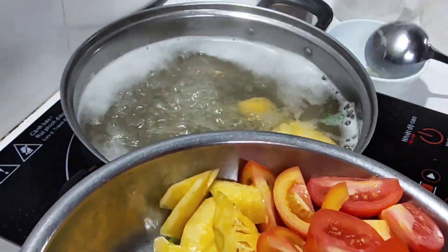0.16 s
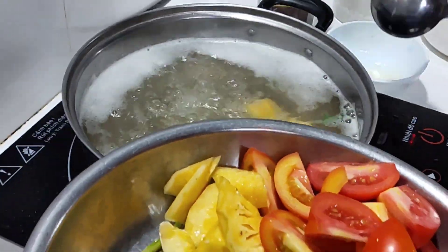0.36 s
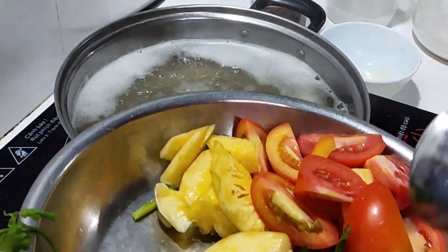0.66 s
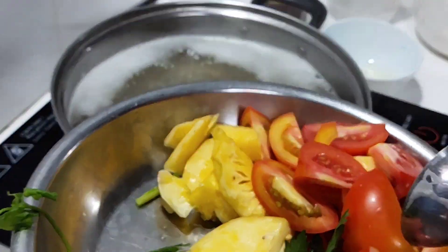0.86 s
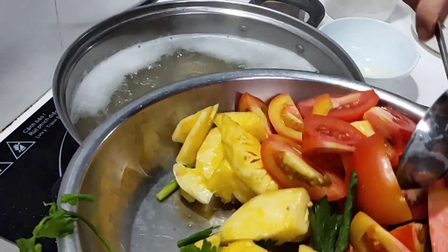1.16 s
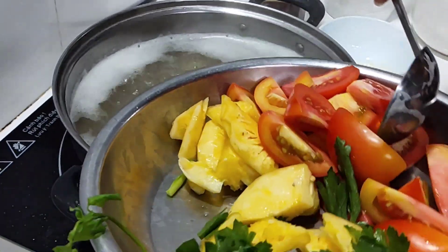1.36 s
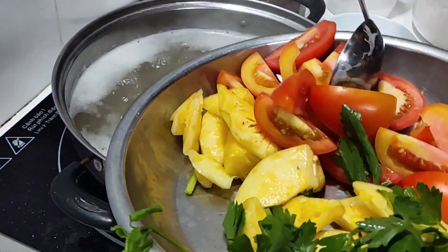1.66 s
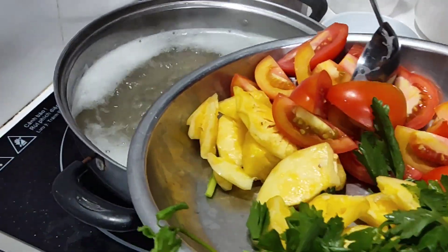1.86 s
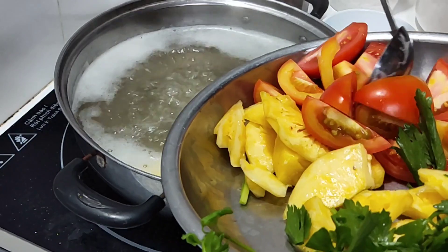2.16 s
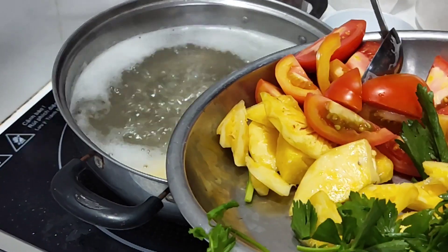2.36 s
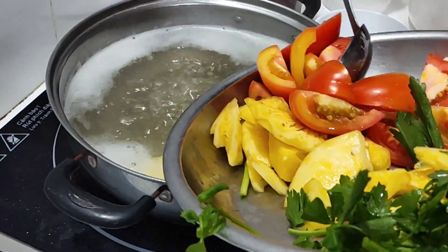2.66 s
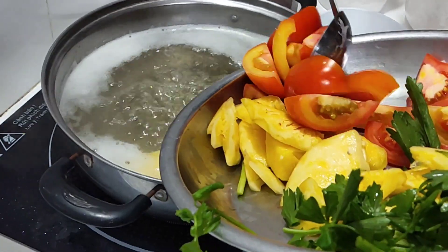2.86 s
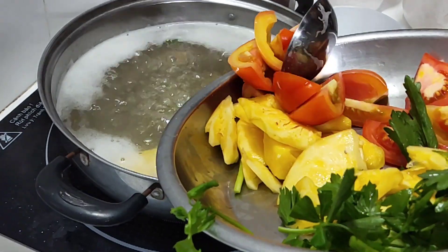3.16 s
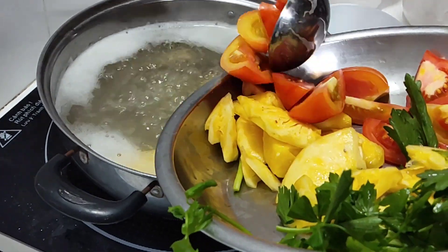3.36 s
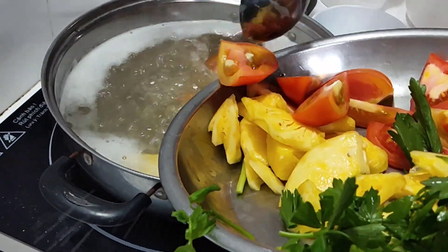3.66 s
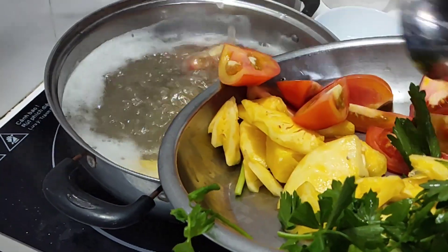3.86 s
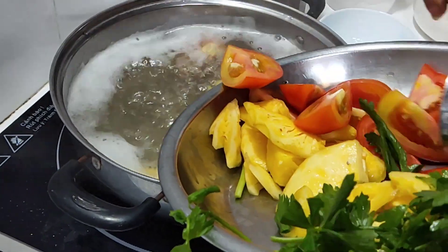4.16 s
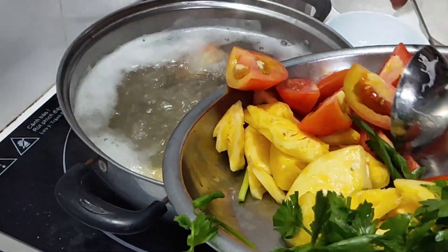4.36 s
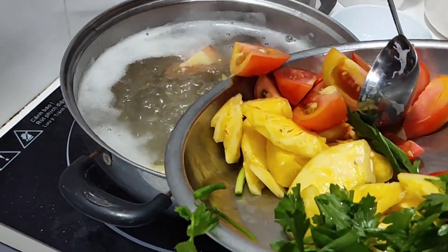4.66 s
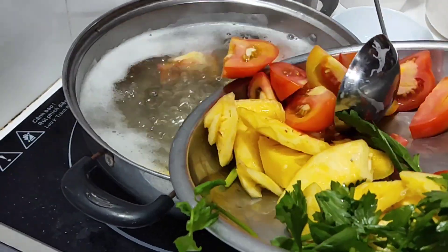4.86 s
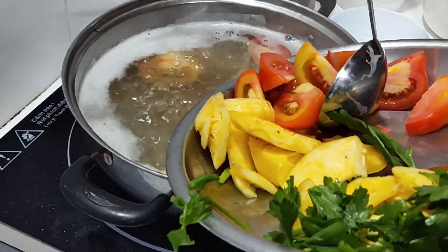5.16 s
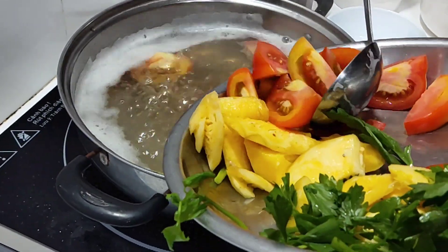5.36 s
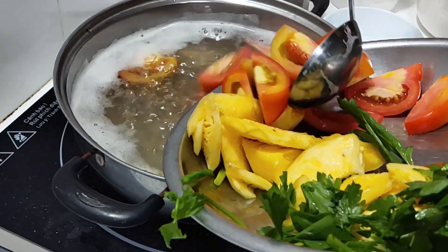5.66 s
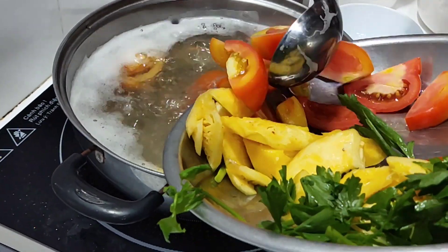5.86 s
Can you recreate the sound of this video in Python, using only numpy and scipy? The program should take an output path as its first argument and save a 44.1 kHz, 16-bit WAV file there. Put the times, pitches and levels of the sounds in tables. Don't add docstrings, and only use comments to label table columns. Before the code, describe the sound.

A bright steel ladle clatter on a dish, then scattered metallic knocks and scrapes in a bowl over a steady fan hum and boiling hiss.

```python
import sys
import numpy as np
from scipy import signal
from scipy.fft import rfft, irfft
from scipy.io import wavfile

SR = 44100
rng = np.random.default_rng(int(sys.argv[2]) if len(sys.argv) > 2 else 0)


def generate_wav(sig):
    pcm = np.round(np.clip(np.atleast_2d(sig).T, -1, 1) * 32767).astype(np.int16)
    wavfile.write(sys.argv[1], SR, pcm)


def boost_factor(decibels):
    exponent = np.asarray(decibels, float) / 20
    return 10 ** exponent


N = 264600
FAR_LEAD_S = -.00033

# (time [s], level above 3.5 kHz [dB], 1.5-3.5 kHz re that [dB], below 1.5 kHz re that [dB])
DISH_HITS = [
    (0.1534, -2.5, -16, -19),
]
# (time [s], treble level [dB], mid re treble [dB], low re treble [dB])
DISH_RATTLE = [
    (0.0918, -18, -22, -18),
    (0.0988, -22.5, -19.5, -18),
    (0.1047, -27.5, -18, 3),
    (0.1592, -7, -43, -7.5),
    (0.164, -6.5, -9, -7.5),
]
# (time of peak [s], treble level [dB], build-up [s], let-off [s], mid re treble [dB])
DISH_SLIDE = [
    (.075, -45, 0.017, .05, -19),
    (.1, -33, 0.011, 0.03, -26),
]
# (frequency [Hz], level [dB], T60 [s])
DISH = [(874, -6, 0.21), (1290, 5, 0.14), (1770, -3, 0.17), (2120, -7.5, 0.33), (2740, -7, 0.15),
        (3440, -18.5, 0.72), (4230, -23.5, 0.45), (4620, -0.5, 0.99), (4770, -10, 0.4), (5360, -2, .26),
        (5700, 9.5, 0.029), (6230, 2.5, 0.052), (6900, -8.5, 0.79), (7140, -10.5, 0.4), (8160, 7, 0.13)]


def dish():
    metal = blows(DISH_HITS, DISH, free_db=-5.5, damped_s=.045, crack_db=9, lead_s=FAR_LEAD_S,
                  wash_s=.33, spread=1)
    metal += blows(DISH_RATTLE, DISH, free_db=-41, damped_s=0.058, crack_db=10, lead_s=FAR_LEAD_S,
                   wash_s=0.22, spread=1)
    metal += scrapes(DISH_SLIDE, DISH, damping=0.092, rasp_db=16.0)
    muted_s, mute_db_per_s = 0.305, 500
    return metal * boost_factor(-mute_db_per_s * np.maximum(np.arange(N) / SR - muted_s, 0))


# (time [s], treble level [dB], mid re treble [dB], low re treble [dB])
SET_DOWN = [
    (0.2854, -32, 14.5, 3.6),
    (0.2904, -29.5, -2, 23),
    (0.3127, -22.5, 4, 6),
    (0.3174, -25, 11.5, 12),
    (.333, -47.5, 9.5, 12),
]
# (frequency [Hz], level [dB], T60 [s])
COUNTER = [(284, -12, 0.084), (680, -8, 0.06), (760, -18, 0.21), (824, 0, 0.036), (1040, -24, 0.14),
           (1290, -5.5, 0.2), (1390, -4, 0.14), (1655, -9, 0.36), (1990, -4, 0.15), (2290, -12, 0.18),
           (2740, -9, 0.13), (3430, -22, 0.1), (4440, -2, 0.08), (5400, -23, 0.22), (5870, -7, .1),
           (6750, -23, 0.22)]
# (time [s], treble level [dB], mid re treble [dB], low re treble [dB])
SETTLE = [
    (0.3455, -17.5, 1, 10),
    (.397, -48, 13, 12),
    (.448, -43, 8.7, 12),
]
# (frequency [Hz], level [dB], T60 [s])
COUNTER_FLAT = [(421, -5.5, 0.16), (616, -1, 0.062), (802, -9, 0.11), (1382, -8, 0.15), (1665, 10, 0.44),
                (2100, -1, .2), (2720, -4, .2), (5100, -9, .1), (6130, 9, .045), (6640, -6, .06)]


def counter():
    metal = blows(SET_DOWN, COUNTER, free_db=-11.5, damped_s=0.023, crack_db=2.5, lead_s=FAR_LEAD_S,
                  wash_s=0.79, spread=1)
    metal += blows(SETTLE, COUNTER_FLAT, free_db=-18.5, damped_s=0.017, crack_db=1.5, lead_s=FAR_LEAD_S,
                   wash_s=0.35, spread=0.83)
    return metal


# (time [s], treble level [dB], mid re treble [dB], low re treble [dB])
BOWL_HITS = [
    (1.904, -30.5, -3, 4.5),
    (2.1853, -33, -17, 0),
    (3.7686, -32.5, -11, -8),
]
# (frequency [Hz], level [dB], T60 [s])
BOWL = [(334, 3.5, 0.16), (560, -3, 0.38), (696, 0, 0.095), (778, 15, 0.33), (1740, -2, 0.25),
        (1843, 3.5, 0.31), (2280, -3.5, 0.57), (2770, 2.5, .25), (2830, -4.5, .1), (3800, 4, 0.17),
        (4570, -28, 0.26), (4890, -16.5, .28), (5040, -5, .2), (5770, 3.5, .15), (6160, -1.5, .5),
        (6070, -7.5, .1), (7300, -9, .2), (7280, -9, .2), (7270, -17.5, 0.18)]
# (time [s], treble level [dB], mid re treble [dB], low re treble [dB])
BOWL_KNOCK = [
    (1.6864, -12, -3, 1),
    (1.6905, -20, 2, -3.5),
    (1.6935, -19.5, 5, -3),
]
# (frequency [Hz], level [dB], T60 [s])
KNOCKED = [(317, 1.5, 0.062), (678, 1.5, 0.1), (858, 1.5, 0.096), (1703, -1, 0.13), (1890, -2, 0.19),
           (2837, -4, 0.085), (4010, -5.5, 0.063), (4860, -9.5, .12), (5020, -2.5, .08),
           (5430, -9.5, 0.063), (5920, -7.5, .08), (6160, -6, .14), (6340, -9.5, .055), (7100, -12, .1),
           (7240, -6, 0.046)]
# (time [s], treble level [dB], mid re treble [dB], low re treble [dB])
RATTLE = [
    (1.0657, -20, -12, -10),
    (1.071, -28, -7, -15),
    (1.079, -34, -7, -19),
    (1.087, -27, -5.5, -19),
    (1.0917, -24.5, -9, -15),
    (1.098, -28, -4, -15),
    (1.104, -28, -11, -16),
    (1.115, -35, -1, -8),
]
# (frequency [Hz], level [dB], T60 [s])
RATTLED = [(580, 5, 0.078), (720, -5, .05), (1335, 0, .1), (1960, -7, .1), (2850, -4, .15),
           (2990, -5.5, 0.11), (4300, -6, .04), (4840, -8, .15), (5000, -13, .08), (5440, -20, .08),
           (6144, 1.5, .15), (6250, -4, .06), (7030, -8, .1), (7400, -16, .08)]


def bowl():
    metal = blows(BOWL_HITS, BOWL, free_db=-13.5, damped_s=0.018, crack_db=8.5, lead_s=.00003, wash_s=.2)
    metal += blows(BOWL_KNOCK, KNOCKED, free_db=-14, damped_s=0.07, crack_db=0.5, lead_s=0, wash_s=0.12,
                   treble_pan_db=-3.5)
    metal += blows(RATTLE, RATTLED, free_db=-6.5, damped_s=0.04, crack_db=-3.0, lead_s=.00002, wash_s=.06,
                   treble_pan_db=-5.0)
    return metal


# (time [s], treble level [dB], mid re treble [dB], low re treble [dB])
RIM_HITS = [
    (4.1742, -12.5, -9, -5),
    (4.1844, -31, -4, 8.5),
    (4.228, -26.5, -14, -13),
]
# (frequency [Hz], level [dB], T60 [s])
RIM = [(436, 6.5, 0.15), (757, 0, 0.2), (934, 2.5, 0.11), (1815, 4.5, 0.16), (2020, 2.5, 0.13),
       (3500, -4.5, 0.023), (4740, -9, 0.1), (5100, -2, 0.065), (5500, 2.5, 0.045), (5880, -3, 0.07),
       (6150, 1.5, 0.14), (6430, -6, 0.093), (6700, -9, .1), (7650, -7.5, 0.1)]
# (time [s], treble level [dB], mid re treble [dB], low re treble [dB])
HANDLE_HITS = [
    (4.2654, -25, -2, -6),
    (4.2724, -31, -4, 6.5),
]
# (frequency [Hz], level [dB], T60 [s])
HANDLE = [(862, 4.5, 0.093), (1330, 0, 0.094), (1700, -5, .06), (2140, 2, 0.053), (4400, -14, 0.05),
          (5700, 6, .06), (6730, 0, .06)]
# (time [s], treble level [dB], mid re treble [dB], low re treble [dB])
HANDLE_TIP = [
    (4.2784, -26, -13, -17),
    (4.2825, -33, -16, -16),
]
# (frequency [Hz], level [dB], T60 [s])
TIP = [(850, 0, .06), (2090, 1, .06), (4400, 4, 0.072), (6430, -15, .05)]


def rim():
    metal = blows(RIM_HITS, RIM, free_db=-18, damped_s=0.11, crack_db=8.5, lead_s=.00002, wash_s=0.11)
    metal += blows(HANDLE_HITS, HANDLE, free_db=-28, damped_s=0.06, crack_db=5.0, lead_s=.00003, wash_s=.1)
    metal += blows(HANDLE_TIP, TIP, free_db=-16, damped_s=0.042, crack_db=-9.0, lead_s=.00003, wash_s=.05)
    return metal


# (time [s], treble level [dB], mid re treble [dB], low re treble [dB])
THUDS = [
    (0.9365, -44, 3, 24),
    (1.0590, -44, 3, 24),
]
# (frequency [Hz], level [dB], T60 [s])
THUD = [(530, 9, 0.021), (780, -9, 0.048), (1800, 0, .05), (4470, -2, .03)]
# (time [s], treble level [dB], mid re treble [dB], low re treble [dB])
FLECK = [
    (3.0599, -32, -8, -5),
]
# (frequency [Hz], level [dB], T60 [s])
FLECKED = [(900, -1, .05), (2000, 0, .05), (4500, -7, .03), (5240, 2, .1), (6300, -5, .05), (7100, -6, .05)]


def fruit():
    metal = blows(THUDS, THUD, free_db=-21, damped_s=0.027, crack_db=-11.0, lead_s=0, wash_s=.05)
    metal += blows(FLECK, FLECKED, free_db=-11, damped_s=0.04, crack_db=1.5, lead_s=0, wash_s=.05)
    return metal


# (time [s], treble level [dB], mid re treble [dB], low re treble [dB])
LADLE_HITS = [
    (0.936, -28, -3.5, -2),
    (1.0355, -22.5, -10, -2),
    (1.24, -39.5, -13, -12),
    (1.263, -27.5, -6, -2.5),
    (1.3994, -42.5, 0, 2.5),
    (4.8083, -33.5, -9, 0),
    (5.1556, -35, -3, 5),
]
# (time [s], treble level [dB], mid re treble [dB], low re treble [dB])
DRY_CLICKS = [
    (0.5985, -29.5, -14, -3),
    (2.5017, -31, 0.5, 2),
    (3.6555, -24, -19, -10),
    (3.6626, -27, -17.5, -0.5),
    (3.71, -30.5, -14.5, -11),
    (3.7386, -42.5, 0, 16),
    (5.757, -17.5, -9, -8),
]
# (frequency [Hz], level [dB], T60 [s])
LADLE = [(524, 4, 0.13), (778, 2.5, 0.37), (1810, -4, 0.13), (2560, -12, 0.025), (4600, 4, 0.018),
         (4610, -7.5, 0.12), (5680, 0, 0.18), (6130, 3, 0.06), (7660, -17.5, .1)]
# (time [s], treble level [dB], mid re treble [dB], low re treble [dB])
PINGS = [
    (1.9577, -46, -11, -22),
    (2.013, -28, -11, 0.5),
    (4.2932, -34, -15, -7),
    (4.8263, -29.5, -16.5, -21),
    (5.637, -32, -19, -24.5),
]
# (frequency [Hz], level [dB], T60 [s])
PING = [(800, 3, 0.059), (1980, -5.5, 0.25), (3000, -9, 0.053), (5370, 0, 0.078), (6020, 3.5, 0.27),
        (6250, -17.5, .1), (6600, -9.5, 0.08)]


def ladle():
    metal = blows(LADLE_HITS, LADLE, free_db=-37.5, damped_s=0.043, crack_db=-2.5, lead_s=.00001, wash_s=.1)
    metal += blows(DRY_CLICKS, LADLE, free_db=-31.5, damped_s=0.04, crack_db=11.0, lead_s=.0001, wash_s=.1)
    metal += blows(PINGS, PING, free_db=-6, damped_s=.045, crack_db=-3, lead_s=.00003, wash_s=.06)
    return metal


# (time [s], treble level [dB], mid re treble [dB], low re treble [dB])
RUB_HITS = [
    (2.8873, -43, -2, -19),
    (2.899, -36, -5, -25),
    (2.908, -40, 5, -19),
    (2.9367, -33, -7, -19.5),
    (2.9454, -36, 2, 0),
]
# (frequency [Hz], level [dB], T60 [s])
RUBBED = [(810, 16, 0.12), (1705, -2.5, 0.12), (1930, -1, 0.096), (3920, -2, 0.17), (5100, -4, 0.11),
          (6020, 3.5, 0.12), (7200, -17, .1)]
# (time [s], treble level [dB], mid re treble [dB], low re treble [dB])
BARE_HITS = [
    (2.9661, -33, -2, -3),
    (2.978, -38, 7, -15),
    (3.027, -34, 5, -15),
    (3.039, -34.5, -2, -15),
    (3.078, -42, 9, -15),
    (3.09, -42, 5, -15),
]
# (frequency [Hz], level [dB], T60 [s])
BARE = [(810, 0, .1), (1940, 0, .12), (2050, -7, .1), (4130, 4, .16), (5130, -10, .06), (5610, -4, .1),
        (6290, -9, .08), (7500, -14, .05)]


def catches():
    metal = blows(RUB_HITS, RUBBED, free_db=-12, damped_s=0.12, crack_db=-5.0, lead_s=-.00001, wash_s=0.071,
                  treble_pan_db=-4.5, rise_per_s=0.11)
    metal += blows(BARE_HITS, BARE, free_db=-12.5, damped_s=0.041, crack_db=-4.5, lead_s=-.00001, wash_s=0.06,
                   treble_pan_db=-6.0)
    return metal


# (time of peak [s], treble level [dB], build-up [s], let-off [s], mid re treble [dB])
SCRAPES = [(1.09, -37, 0.024, 0.064, -5.5), (1.26, -45.5, 0.27, 0.44, -5), (1.402, -51, 0.036, 0.029, -2),
           (1.91, -47.5, 0.1, 0.11, -5), (1.964, -45.5, 0.031, 0.22, -3), (2.2, -42.5, 0.053, .083, -9.5),
           (3.664, -39, 0.02, 0.015, -4), (3.764, -46, .09, 0.035, -4), (4.834, -49, .1, 0.25, -13),
           (5.608, -47.5, 0.15, 0.031, -12), (5.636, -48, .01, 0.055, -2)]
# (time of peak [s], treble level [dB], build-up [s], let-off [s], mid re treble [dB])
RUB = [
    (2.875, -55, 0.011, 0.26, -5),
    (2.974, -44, 0.12, 0.029, -8),
    (3.03, -49.5, 0.0097, 0.22, 0),
]
# (time of peak [s], treble level [dB], build-up [s], let-off [s], mid re treble [dB])
RIM_DRAG = [
    (4.18, -34, .005, 0.09, -6),
    (4.232, -35.5, 0.017, .08, -13),
    (4.255, -37.5, 0.064, .07, -17),
    (4.275, -46.5, 0.032, 0.03, -4),
]
# (frequency [Hz], level [dB], T60 [s])
DRAGGED = [(1880, -1, .1), (2220, -14.5, 0.047), (3860, -14, 0.086), (4700, -2, 0.11), (5400, 1, .1),
           (5730, -3.5, 0.15), (6100, 2, 0.11), (6170, -2, .1), (6840, -8, .1), (6440, -12, 0.092),
           (7300, -4, 0.092), (7750, -17, 0.076)]


def sliding():
    metal = scrapes(SCRAPES, LADLE + PING, damping=0.11, rasp_db=13.0)
    metal += scrapes(RUB, RUBBED, damping=0.37, rasp_db=14.0)
    metal += scrapes(RIM_DRAG, DRAGGED, damping=0.37, rasp_db=12.5, uneven_db=3.5)
    return metal


def ringing(body, t, lead_s, spots):
    hz, db, t60 = np.transpose(body)[:, :, None, None]
    spacing_s = .00008
    lag = (lead_s + spacing_s * spots) * np.minimum(hz / 1150, 1) ** 4
    turn = np.pi * hz * lag * [[1], [-1]]
    strength = boost_factor(db + rng.normal(0, 0.37, (len(body), 1, 1)))
    twin, spacing = 0.33, 0.0046
    split = spacing * rng.uniform(0.85, 1.6, (2, len(body), 1, 1)) * [[[[1]]], [[[-1]]]]
    beats = 1 + twin * np.sin(2 * np.pi * hz * split * t).sum(axis=0)
    start = rng.random((len(body), 1, 1))
    carriers = strength * beats * np.sin(2 * np.pi * (hz * t + start) + turn)
    return carriers, boost_factor(-60 * t / t60)


def in_band(x, low_hz, high_hz):
    return signal.sosfilt(signal.butter(2, [low_hz, high_hz], "band", fs=SR, output="sos"), x)


# (modes from [Hz], modes to [Hz], crack from [Hz], crack to [Hz], crack likeness [0-1])
RANGES = [(250, 1500, 300, 1400, .85), (1500, 3500, 1500, 2900, .4), (3500, 9000, 4300, 7400, .2)]


def blows(hits, body, free_db, damped_s, crack_db, lead_s, wash_s, rise_per_s=0, spread=0.36, treble_pan_db=0):
    out = np.zeros((2, N + SR))
    t = np.arange(SR // 4) / SR
    hz = np.transpose(body)[0]
    spots = spread * rng.uniform(-0.9, 1, (len(body), 1, 1))
    for s, peak_db, mid_db, low_db in hits:
        raised = np.array(body) * [1 + rise_per_s * (s - hits[0][0]), 1, 1]
        carriers, free = ringing(raised, t, lead_s, spots)
        modes = carriers * free
        white = rng.standard_normal((3, len(t)))
        at = round(s * SR)
        for (low_hz, high_hz, *crack_hz, alike), db in zip(RANGES, [low_db, mid_db, 0]):
            damped = boost_factor(-60 * t / max(damped_s, .008) * (low_hz / 3500) ** 0.17)
            inside = (hz >= low_hz) & (hz < high_hz)
            ring = modes[inside].sum(axis=0) * (damped + boost_factor(free_db))
            dense = boost_factor(crack_db) * (damped + boost_factor(free_db - 60 * t / wash_s))
            noise = alike * white[0] + (1 - alike) * white[1:]
            crack = in_band(noise * dense, *crack_hz)
            onset = np.minimum(t / 0.00067 * (low_hz / 3500) ** 0.4, 1)
            part = onset * (ring + crack)
            pan_db = treble_pan_db * (low_hz == RANGES[-1][0]) * np.array([[.5], [-.5]])
            out[:, at:at + len(t)] += boost_factor(peak_db + db + pan_db) * part / np.abs(part).max(axis=1).mean()
    return out[:, :N]


def scrapes(strokes, body, damping, rasp_db, uneven_db=4.5):
    high, mid = np.zeros((2, N))
    for *shape, mid_db in strokes:
        pressure = stroke(*shape)
        high = high + pressure
        mid = mid + boost_factor(mid_db) * pressure
    slips = rng.random(N) < 1600 / SR
    strength = boost_factor(uneven_db * rng.exponential(1, N).clip(0, 3))
    ticks = rms_one(slips * strength * rng.choice([-1, 1], N))
    t = np.arange(SR // 8) / SR
    carriers, free = ringing(body, t, 0, rng.uniform(-1.1, 1, (len(body), 1, 1)))
    modes = carriers * free ** (1 / damping)
    hz = np.transpose(body)[0]
    rasp = rng.standard_normal((2, len(t))) * boost_factor(rasp_db - 60 * t / 0.015)
    out = 0
    for (low_hz, high_hz, *rasp_hz, _), pressure in zip(RANGES[1:], [mid, high]):
        inside = (hz >= low_hz) & (hz < high_hz)
        metal = modes[inside].sum(axis=0) + in_band(rasp, *rasp_hz)
        metal /= np.sqrt(np.mean(np.sum(metal ** 2, axis=1)) / 2)
        out = out + signal.fftconvolve((ticks * pressure)[None], metal)[:, :N]
    return out


def stroke(s, level_db, build_s, let_off_s):
    t = np.arange(N) / SR - s
    return boost_factor(level_db - 20 * np.where(t < 0, -t / max(build_s, .003), t / max(let_off_s, .003)))


def kitchen(x):
    t = np.arange(SR // 2) / SR
    low, high = rng.standard_normal((2, 2, len(t))) * (t > .006)
    cross_hz = 2600
    tail = in_band(low, 60, cross_hz) * boost_factor(-60 * t / 0.41)
    tail += in_band(high, cross_hz, 6000) * boost_factor(-4.5 - 60 * t / 0.38)
    return signal.fftconvolve(x, tail / np.sqrt(np.sum(tail[0] ** 2)), axes=1)[:, :N]


# (frequency [Hz], density [dB per Hz])
DRONE = [(88, -35), (150, -21), (190, -12), (222, -18.5), (238, -11.5), (276, -7), (377, -7.5), (404, -2.5),
         (422, -7), (437, -17.5), (461, -17.5), (498, -9.5), (521, -14), (688, -9.5), (1200, -23.5),
         (1560, -51.5), (2640, -120)]
# (frequency [Hz], density [dB per Hz])
HISS = [(710, -48.5), (1200, -11.5), (1330, -3), (1440, -2.5), (1480, -2.5), (1810, -5), (1960, -6),
        (2120, -4), (2260, -6.5), (3550, -12), (5060, -8), (6980, -11), (7390, -15), (7850, -18.5),
        (7930, -60), (10700, -81), (18000, -120)]
# (frequency [Hz], density [dB per Hz])
RUMBLE = [(12, -42.5), (20, -4.5), (124, 0.5), (150, -10), (200, -29.5), (330, -120)]
# (time of peak [s], level [dB], build-up [s], let-off [s])
CLATTER = (-0.06, -20, -2.3, -0.02)
# (frequency [Hz], width [Hz], level [dB])
HUMS = [(409.1, 9, -39.5), (285.7, 35, -45.5), (69.7, 5.9, -66)]
# (multiple of blade rate [1], level [dB])
BLADE_ORDERS = [(2, -45.5), (3, -70), (6, -61.5), (8, -59.5), (9, -57.5)]


def hob():
    drone_level = boost_factor(-35.5 + .9 * drift(4.8))
    out = drone_level * coloured(DRONE)
    hiss_level = boost_factor(-45.5 + .5 * drift(5.5))
    out += np.hypot(hiss_level, stroke(*CLATTER)) * coloured(HISS)
    fade_db = 1.5 * np.arange(N) / SR
    out += boost_factor(-49 - fade_db + 2.1 * drift(3.9)) * coloured(RUMBLE)
    for hz, width_hz, db in HUMS:
        out += boost_factor(db) * hum(hz, width_hz)
    blade_hz = 231
    for k, db in BLADE_ORDERS:
        out += boost_factor(db) * hum(k * blade_hz, 1.0 * k + 3)
    return out


def coloured(spectrum):
    low_hz, high_hz = spectrum[0][0], spectrum[-1][0]
    return pair_noise(lambda hz: boost_factor(at_hz(spectrum, hz)) * (hz > low_hz) * (hz < high_hz))


def hum(centre_hz, width_hz):
    return pair_noise(lambda hz: 1 / (1 + (2 * (hz - centre_hz) / width_hz) ** 2))


# (frequency [Hz], likeness [0-1])
LIKENESS = [(25, .3), (60, .82), (150, .92), (400, .97), (600, .88), (850, .65), (1100, .6), (1450, .15),
            (1900, .2), (2300, .4), (3500, .5), (4600, .22), (5500, .38), (6200, .18), (8000, .15)]
# (frequency [Hz], left leads [rad])
LEAD = [(0, 0), (450, 0), (860, -.4), (1150, 0), (1600, 2), (1900, -.6), (2400, .2), (8270, -15.6)]
# (frequency [Hz], left over right [dB])
TILT = [(60, 2), (94, -0.5), (150, 3.5), (230, 1), (360, 3.5), (560, 1), (870, 5.5), (1360, 1), (2130, 7.5),
        (3330, -1.5), (5200, 3), (8120, -3.5)]


def pair_noise(gain_at):
    hz = np.arange(N // 2 + 1) * SR / N
    shared, left, right = rfft(rng.standard_normal((3, N)))
    alike = np.clip(at_hz(LIKENESS, hz), 0, 1)
    turn = np.exp(.5j * np.interp(hz, *np.transpose(LEAD))) * boost_factor(at_hz(TILT, hz) / 2)
    ears = np.sqrt(alike) * shared + np.sqrt(1 - alike) * np.array([left, right])
    out = irfft(gain_at(hz) * ears * [turn, 1 / turn], N)
    return out / np.std(out.mean(axis=0))


def drift(rate_hz):
    r = np.exp(-80 * np.pi * rate_hz / SR)
    white = rng.standard_normal(N // 40 + 2002)
    slow = signal.lfilter([1], [1, -2 * r, r * r], white)[2000:]
    return np.interp(np.arange(N) / 40, np.arange(len(slow)), rms_one(slow))


def at_hz(points, hz):
    at, value = np.transpose(points)
    return np.interp(np.log(hz + 1), np.log(at + 1), value)


def rms_one(x):
    return x / np.sqrt(np.mean(x ** 2) + 1e-20)


def scene():
    background = hob()
    far = dish() + counter()
    metal = far + bowl() + rim() + fruit() + ladle() + catches() + sliding()
    metal *= boost_factor(np.array([[1.1], [-1.1]]))
    near_room_db, room_db = -5, -10.5
    to_room = far + boost_factor(near_room_db) * (metal - far)
    return metal + boost_factor(room_db) * kitchen(to_room) + background


def band_limit(x):
    return signal.sosfilt(signal.butter(12, 9600, fs=SR, output="sos"), x)


# (frequency [Hz], gain [dB])
TOP_EDGE = [(7600, -0.5), (7800, -8), (7950, -23.5), (8100, -33), (8800, -48.5), (10000, -75.5),
            (20000, -100)]


def record(dry):
    hz = np.arange(N // 2 + 1) * SR / N
    mix = irfft(rfft(dry) * boost_factor(at_hz(TOP_EDGE, hz)), N)
    return band_limit(mix)


dry = scene()
out = record(dry)
generate_wav(out)
```